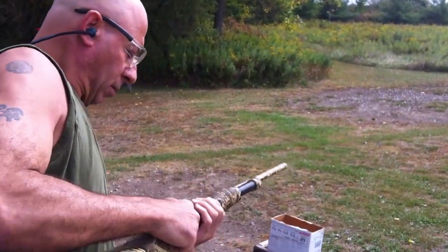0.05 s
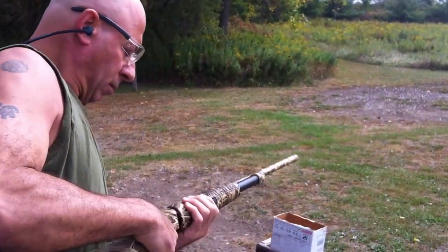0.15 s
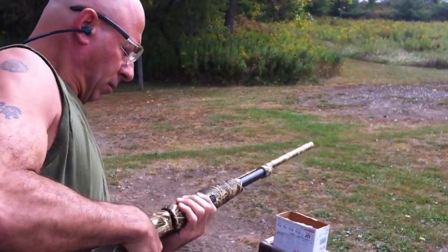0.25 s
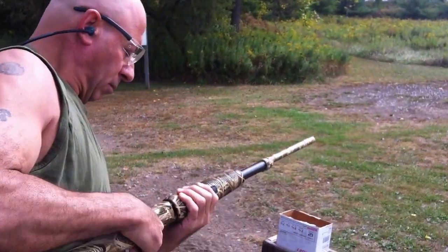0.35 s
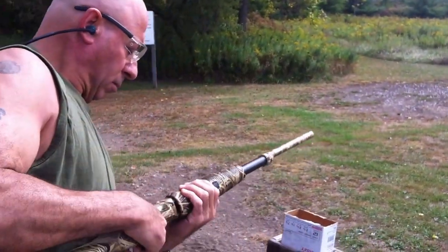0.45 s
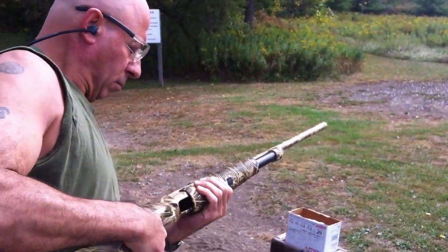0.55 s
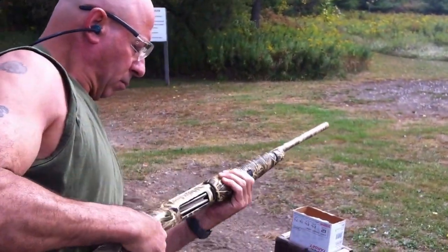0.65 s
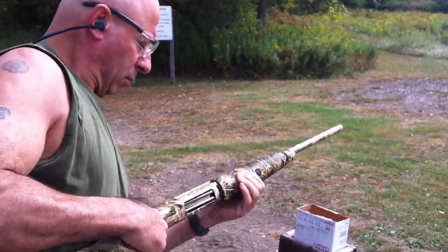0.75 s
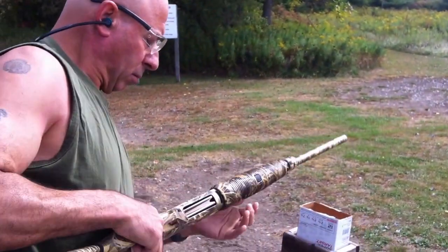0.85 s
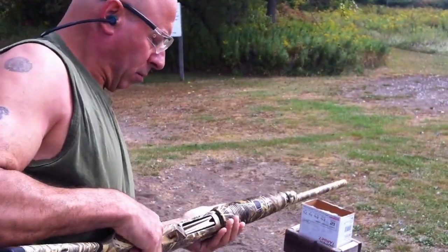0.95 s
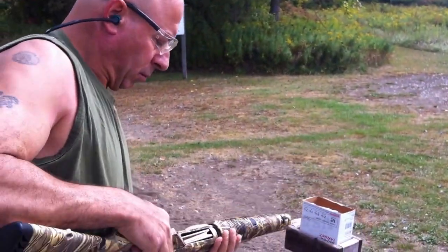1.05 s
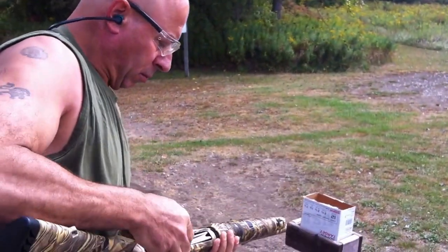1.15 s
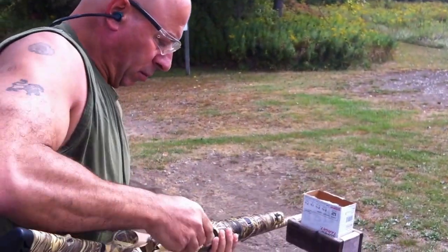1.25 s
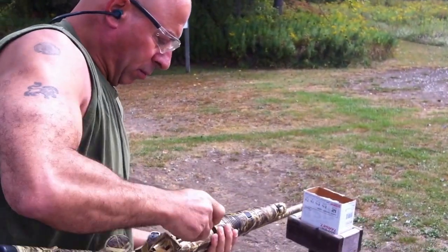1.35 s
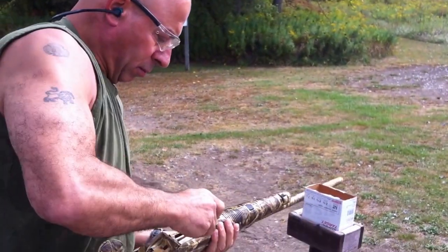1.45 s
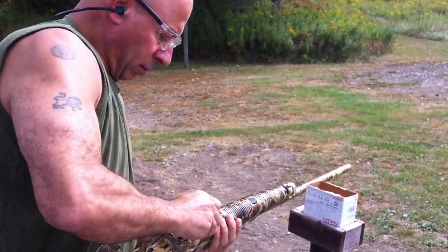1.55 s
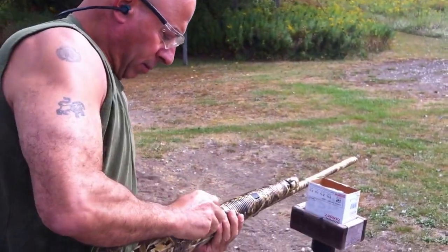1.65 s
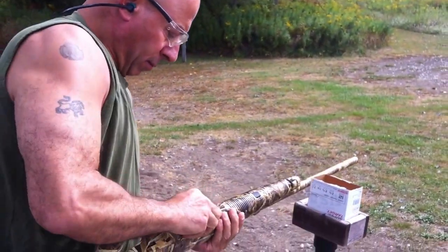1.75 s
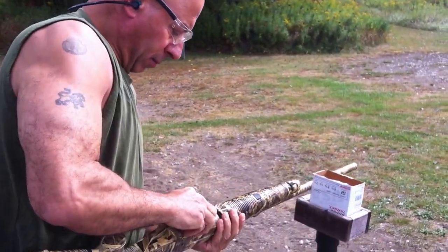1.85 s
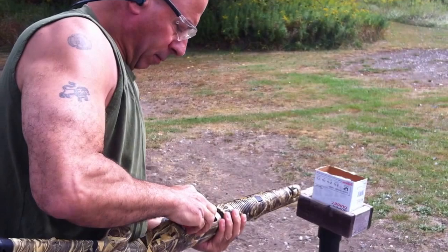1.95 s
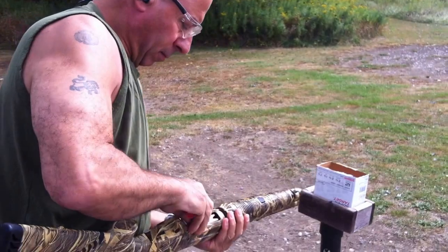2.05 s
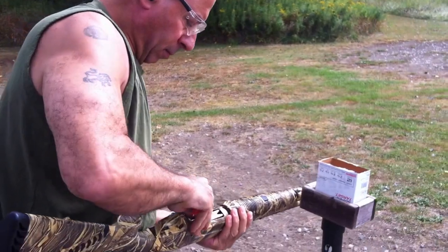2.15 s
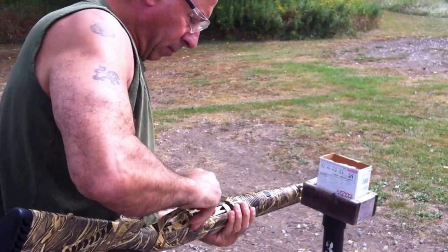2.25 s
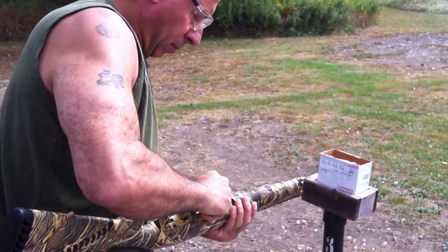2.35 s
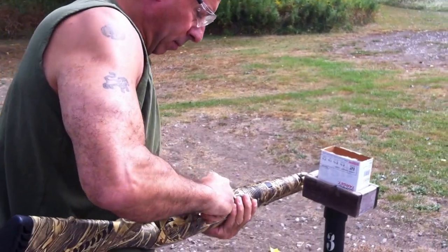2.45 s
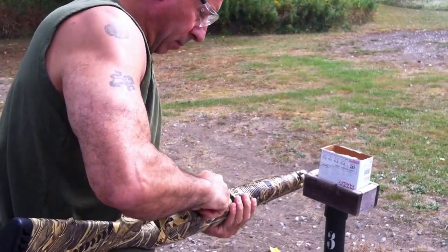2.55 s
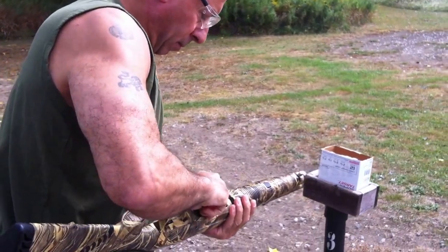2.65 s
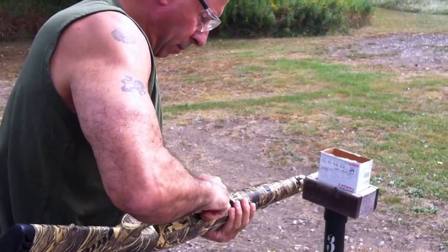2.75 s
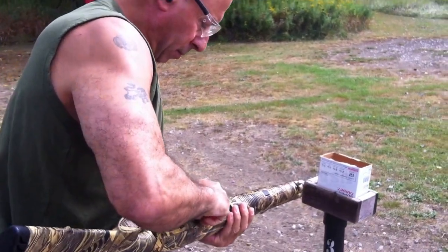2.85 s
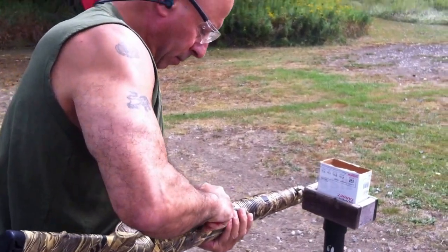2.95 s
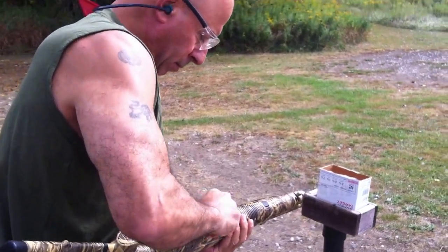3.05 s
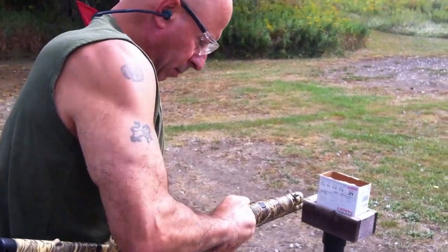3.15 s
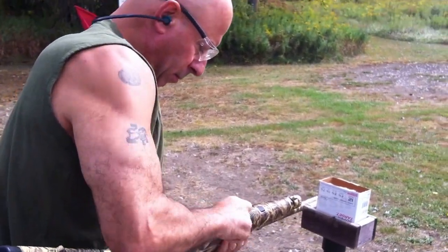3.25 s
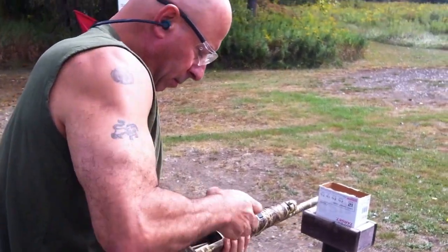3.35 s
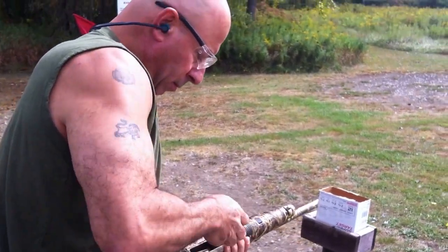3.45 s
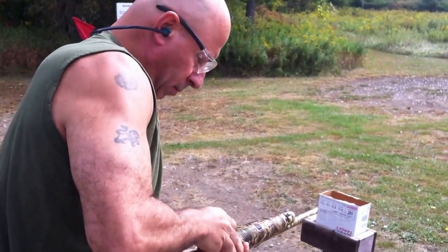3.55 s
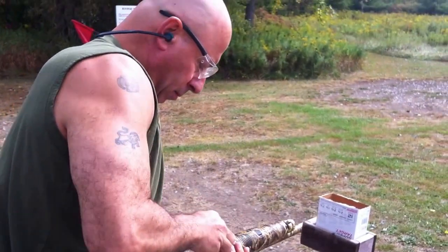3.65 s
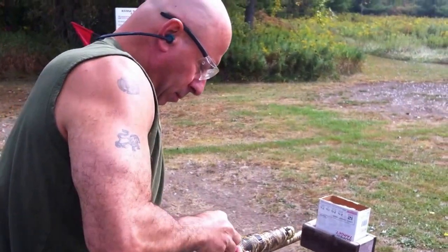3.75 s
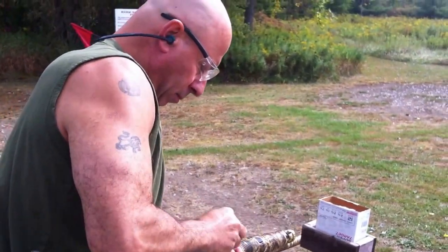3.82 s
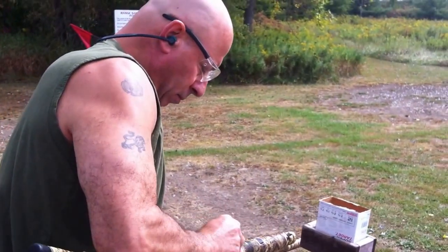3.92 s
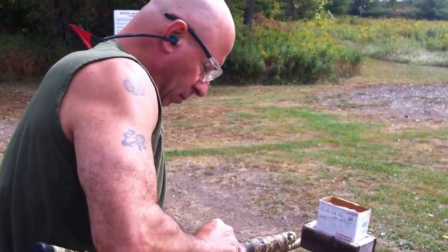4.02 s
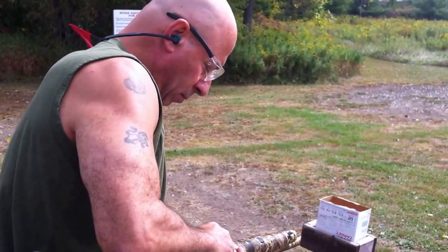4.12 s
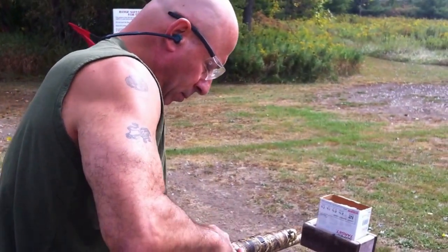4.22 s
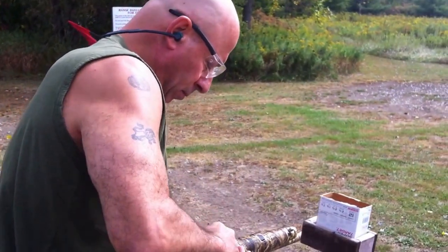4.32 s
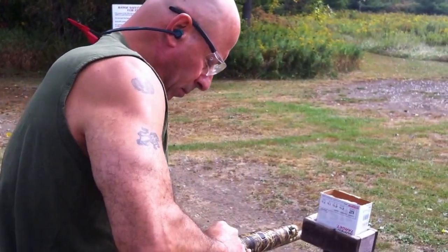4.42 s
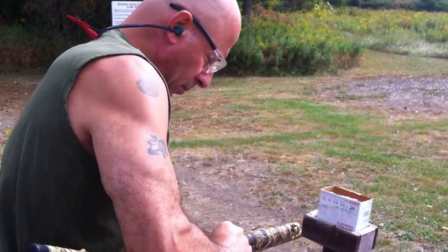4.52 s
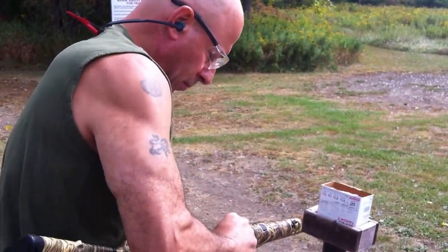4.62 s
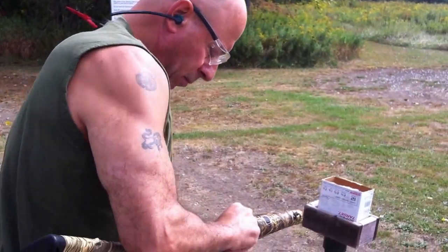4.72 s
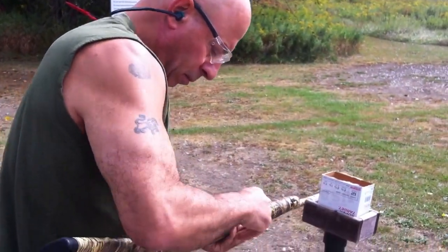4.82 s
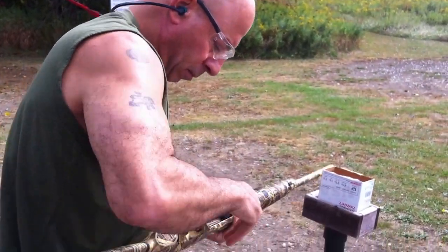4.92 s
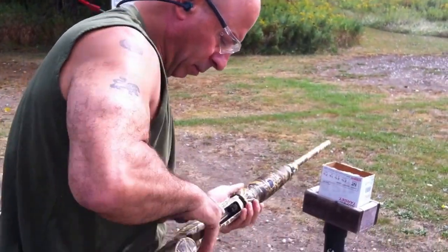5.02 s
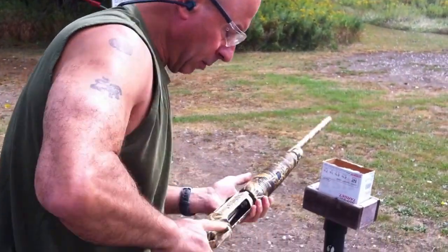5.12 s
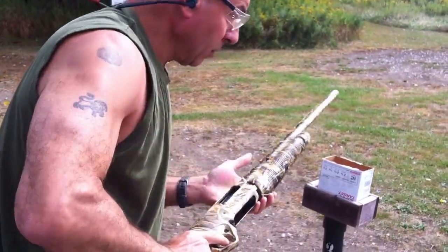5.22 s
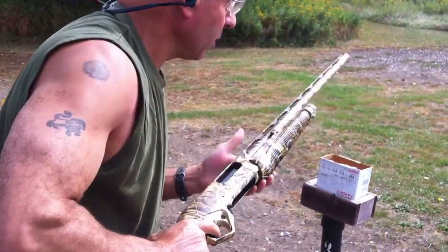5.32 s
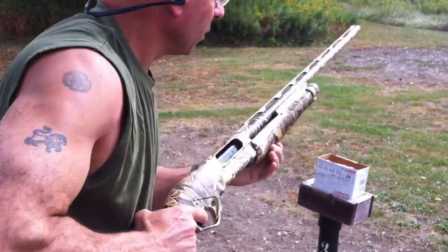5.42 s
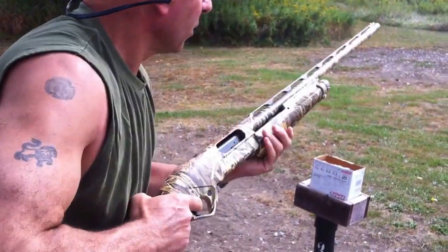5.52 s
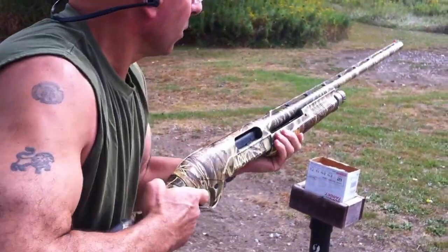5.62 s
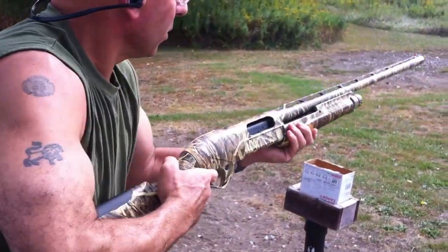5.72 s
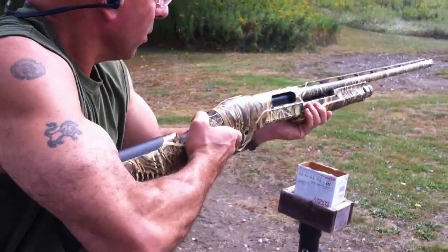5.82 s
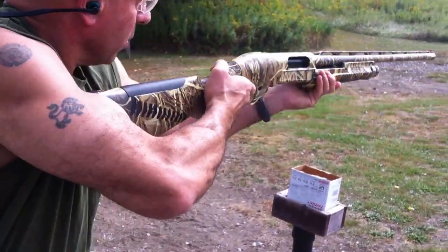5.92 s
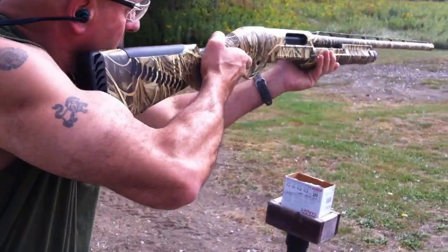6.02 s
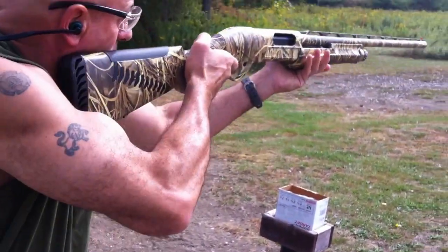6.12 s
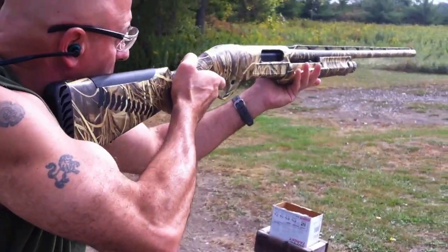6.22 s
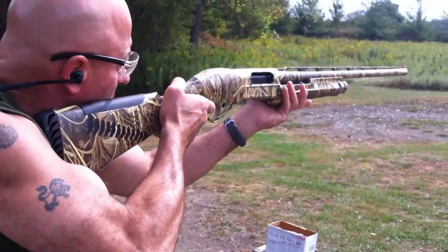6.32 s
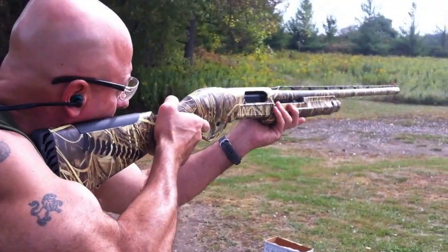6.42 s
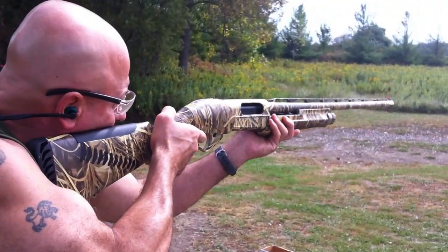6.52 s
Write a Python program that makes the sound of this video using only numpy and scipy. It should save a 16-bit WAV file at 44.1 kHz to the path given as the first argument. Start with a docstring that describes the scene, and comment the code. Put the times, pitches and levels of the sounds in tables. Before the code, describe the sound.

A nearby microphone in a grassy field catches a gun action racked with a hard, bright metal crash, the background dipping slightly afterwards. Then come quiet gaps broken by crisp snaps, rubbing and clustered clicks of shells going into a tube. A thin whistle-like squeak marks the final push. Soft knocks follow, then only far rustle and fine insect trilling remain.

```python
"""Outdoors in a grassy field, a pump shotgun is racked and loaded close by: shells click past the lifter
and slide into the magazine tube. Knocks and scrapes shake four parts of the gun, each a set of resonances.
The magazine spring squeaks as a gliding sine. Insects trill as pulsed hiss over far rustle and light wind,
both shaped noise. The recorder's gain control turns the sound down after loud passages."""
import sys
import numpy as np
from scipy import signal
from scipy.fft import rfft, irfft
from scipy.io import wavfile
from scipy.ndimage import uniform_filter1d

SR = 44100
rng = np.random.default_rng(int(sys.argv[2]) if len(sys.argv) > 2 else 0)


def unload_wav(signal):
    """Save mono or channel-first audio to the path in sys.argv[1] as 16-bit WAV at rate SR, clipped to [-1, 1]."""
    wavfile.write(
        sys.argv[1],
        SR,
        np.round(np.clip(np.atleast_2d(signal).T, -1, 1) * 32767).astype(np.int16),
    )


N = 290072


def gain_of(db):
    """Turns decibels into amplitude."""
    return 10 ** (np.asarray(db) / 20)


def evened(x):
    """Scales a signal to an rms (average strength) of 1."""
    return x / np.sqrt(np.mean(x ** 2) + 1e-20)


def add(mix, start_s, sound):
    """Mixes a sound in at a start time, cut off where the mix ends."""
    part = mix[..., round(start_s * SR):][..., :sound.shape[-1]]
    part += sound[..., :part.shape[-1]]


def coloured(points):
    """Steady noise of rms 1 whose spectrum joins the given points on a log-frequency axis."""
    points_hz, points_db = np.transpose(points)
    hz = np.fft.rfftfreq(N, 1 / SR)
    spectrum_db = np.interp(np.log(hz + 1), np.log(points_hz), points_db)
    white = rng.standard_normal(N)
    return evened(irfft(rfft(white) * gain_of(spectrum_db), N))


def mode(x, hz, width_hz):
    """A two-pole resonance, one pitch a body rings at, scaled so that white noise keeps its power."""
    r = np.exp(-np.pi * width_hz / SR)
    feedback = [1, -2 * r * np.cos(2 * np.pi * hz / SR), r ** 2]
    return np.sqrt((1 - r ** 2) / 2) * signal.lfilter([1, 0, -1], feedback, x)


BREEZE_DB, LULL_S, LULL_LENGTH_S, LULL_DB = -67.5, 0.83, 0.49, -7.5  # the lull is relative to the breeze
# Gusts at the microphone: peak_s, level_db, reach_s (this far from its peak a gust is down to a seventh)
GUSTS = [(.0, -46.5, 0.071), (1.48, -56, 0.11), (1.674, -52, 0.023), (1.845, -47, 0.035),
         (2.4, -58.5, 0.39)]


def wind():
    """Lumpy low buffeting at the microphone: a steady breeze with one lull, and a few gusts."""
    t = np.arange(N) / SR
    in_lull = (t > LULL_S) & (t < LULL_S + LULL_LENGTH_S)
    level = gain_of(BREEZE_DB + LULL_DB * in_lull)
    for peak_s, db, reach_s in GUSTS:
        level = level + gain_of(db) * np.exp(-abs(t - peak_s) * 2 / reach_s)
    lumps = evened(uniform_filter1d(uniform_filter1d(rng.standard_normal(N), 1500), 1500))
    # pitch_hz, relative level_db
    buffet = coloured([(20, -23), (60, -13.0), (130, 1), (200, -0.5), (300, -17.0), (600, -38)])
    return level * gain_of(2.0 * lumps) * buffet


RUSTLE_DB = -55  # overall level
# Tone colour of the far leaves and air: pitch_hz, level_db (per Hz, relative)
RUSTLE = [(24, -39), (40, -19), (137, -10), (220, 1), (529, -5.5), (770, -1), (852, -4), (2700, -4),
          (5050, -13.5), (8340, -10.5), (8990, -15.5), (12100, -13), (16000, -13.5)]


def rustle():
    """Far leaves and air: shaped noise that swells a little, slowly and at random."""
    swell = evened(uniform_filter1d(uniform_filter1d(rng.standard_normal(N), 6000), 6000))
    swell_db = 0.6 * swell
    return gain_of(RUSTLE_DB + swell_db) * coloured(RUSTLE)


CRICKETS_HZ, CRICKETS_DB = 6650, -72  # a faint steady band
TRILL_RISE_S, BETWEEN_DB = 0.99, -64.5  # time for a full-scale rise; hiss level between phrases
STUTTER_S, STUTTER_DB, STUTTER_PER_S = 0.43, 9.5, 13
# Insect phrases: start_s, length_s, level_db, fade_s (fade at the end)
INSECTS = [(0.03, 2.1, -56, 0.072), (1.75, 1.1, -61, 0.35), (2.985, 2.35, -56.5, .5), (5.672, 2.2, -56, .5)]
# Tone colour of the insect hiss: pitch_hz, level_db (per Hz, relative)
TRILL = [(9000, -20), (10500, -7.5), (12000, -0.5), (13500, -1.5), (15000, -4.5), (16000, -6.5)]


def insects():
    """High hiss pulsed about 45 times a second; phrases stutter in, swell and fade over far crickets."""
    t, level = np.arange(N) / SR, gain_of(BETWEEN_DB)
    for start_s, length_s, db, fade_s in INSECTS:
        u = t - start_s
        rise = 0.28 + u / TRILL_RISE_S
        fade = (length_s - u) / fade_s
        shape = np.clip(np.minimum(rise, fade), 0, 1) * (u > 0)
        stutter_left = np.clip(1.3 - u / STUTTER_S, 0, 1)
        stutter_db = STUTTER_DB * stutter_left * np.cos(2 * np.pi * STUTTER_PER_S * u)
        level = np.hypot(level, shape * gain_of(db + stutter_db))
    drift = evened(uniform_filter1d(rng.standard_normal(N), 20000, mode="wrap"))
    pulses_per_s = 45.0 + 1.6 * drift
    pulses_db = 2.5 * np.cos(2 * np.pi * np.cumsum(pulses_per_s) / SR)
    chorus = evened(mode(mode(rng.standard_normal(N), CRICKETS_HZ, 600), CRICKETS_HZ, 600))
    return level * gain_of(pulses_db) * coloured(TRILL) + gain_of(CRICKETS_DB) * chorus


TICK_DB, TICK_HZ = -4.5, 2850  # level is relative to the blow
CRISP_S = 0.0035  # chatter this short leaves the tick at TICK_DB; shorter is louder, longer softer
# Knocks: start_s, blow_db (on the receiver), stock_db and lifter_db (relative to the blow),
# spot_hz (pitch favoured by the spot struck), chatter_s (time for the chatter to fall 60 dB)
KNOCKS = [(.182, -44.5, 11.5, -3, 850, 0.02), (.341, -32.5, 2.5, -9, 802, 0.011),
          (0.375, -45.5, 8, 2, 1360, 0.061), (.438, -29, 0, -15, 2190, .017),
          (.451, -20.5, -10, 5, 2720, 0.01), (.467, -27.5, -5, 4, 2180, 0.015),
          (.524, -32, -15, -1.5, 4080, 0.026), (.545, -32.5, -2.5, -20, 1230, .023),
          (.679, -29, -4, -25, 1160, .014), (0.688, -27, 8.5, 3.5, 2550, 0.046),
          (0.708, -17, -3, -0.5, 886, 0.024), (.735, -21, -18, 4, 1840, 0.022),
          (.752, -12.5, -2.5, 8.5, 1890, 0.025), (.757, -13, -4.5, -1, 1830, 0.022),
          (0.776, -12.5, -5.5, 2.5, 3550, 0.027), (.783, -14, 3, 8, 1980, 0.027),
          (0.797, -6, -10, -0.5, 2980, 0.041), (0.804, -1.5, -10, -10.5, 2164, 0.021),
          (0.872, -38, -18, 3, 2490, 0.063), (0.935, -31, 1, -12, 640, 0.036),
          (1.081, -25, -18, -5, 2230, .04), (1.086, -39, 7, -3, 1128, .04),
          (1.264, -42, 0, -9, 1130, 0.037), (1.743, -29, 0, -9, 1450, 0.056),
          (2.55, -35.5, -2, -3, 774, 0.028), (2.673, -19, -4.5, 11.5, 4780, 0.02),
          (2.677, -41, -13, 24, 4640, 0.011), (2.739, -52, 0, 15.5, 6470, 0.026),
          (2.845, -39.5, 4.5, -9, 1230, 0.0051), (2.853, -28.5, -5.5, -6, 730, .02),
          (2.973, -16, -4.5, 2.5, 9350, 0.017), (3.039, -43, 2, 2, 645, .027),
          (3.224, -25.5, 2.5, -18, 3600, 0.019), (3.298, -17, 3.5, 6, 1530, 0.013),
          (3.304, -20, -15, -5, 1540, 0.071), (3.313, -28, -14, 3, 2600, 0.027),
          (3.366, -39.5, -12, 3, 1570, 0.051), (3.422, -20, -1.5, 1, 1450, 0.033),
          (4.187, -15.5, -3.5, 1.5, 8500, 0.011), (4.288, -12.5, -20, 5, 8500, 0.0067),
          (4.291, -35, -10, 23, 7900, 0.012), (4.356, -44.5, -9, 8.5, 7000, 0.032),
          (4.543, -34, 7, 1, 1570, 0.036), (4.563, -36.5, 4, -8, 1620, 0.0044),
          (4.608, -19, -6, -14, 1290, 0.0026), (4.617, -27.5, -1, -9, 1240, 0.0033),
          (4.656, -26, -3, -4, 3040, 0.0088), (4.712, -27.5, -18, -8, 1550, 0.037),
          (4.731, -10.5, -2, 6.5, 3800, 0.012), (4.735, -16.5, -15, -13, 1550, 0.01),
          (4.798, -41, -1, 1, 1550, 0.034), (4.911, -22, -8, 5, 2720, 0.027),
          (4.913, -28.5, 12.5, 3, 624, 0.015), (5.39, -53, 11.5, -6, 324, .02),
          (5.447, -36.5, -16, 0, 2200, 0.045), (5.629, -28.5, -2, -10, 1820, 0.011),
          (5.634, -22.5, -15, -1.5, 2750, .038)]


def ticks():
    """The bare contact of each knock: about one cycle of air, heard along with the ringing parts."""
    out, t = np.zeros(N), np.arange(-40, 40) / SR
    snap = np.sin(2 * np.pi * TICK_HZ * t) * np.exp(-(TICK_HZ * t * 3.0) ** 2)
    for start_s, blow_db, *_, chatter_s in KNOCKS:
        crispness = min(CRISP_S / chatter_s, 2)
        add(out, start_s, gain_of(blow_db + TICK_DB) * crispness * snap)
    return out


PINS_DB = -6  # the small pins answer a knock this far below the lifter


def knock_force(part, hz):
    """Force on one mode: a sharp first contact, then dying chatter; the spot struck favours one pitch."""
    force, t = np.zeros(N), np.arange(3000) / SR
    for start_s, blow_db, stock_db, lifter_db, spot_hz, chatter_s in KNOCKS:
        part_db = (stock_db, 0, lifter_db, lifter_db + PINS_DB)[part]
        spot_db = 11.1 * np.exp(-(np.log(hz / spot_hz) / 0.1) ** 2)
        chatter = gain_of(-60 * t / chatter_s) / np.sqrt(chatter_s / 0.0064)
        contact = 0.35 * np.exp(-t / 0.00045)
        onset = np.minimum(t / 0.00076, 1)
        add(force, start_s, gain_of(blow_db + part_db + spot_db) * (chatter + contact) * onset)
    return force


def hump(start_s, top_s, end_s):
    """Shares of the rise still to come and of the fall gone by, and where the stroke sounds."""
    t = np.arange(N) / SR
    before = np.clip((top_s - t) / (top_s - start_s), 0, 1)
    after = np.clip((t - top_s) / max(end_s - top_s, .001), 0, 1)
    return before, after, (t >= start_s) & (t <= end_s)


SWELL_DB, DIE_DB = 17, 16.5  # a stroke swells to its hardest, then dies
TREBLE_SHARE = 0.69  # the treble follows this much of the swell
# Strokes of metal or shell sliding: start_s, hardest_s, end_s, scrape_db, treble_db (relative to the scrape)
# A stroke stops at end_s even before its hardest; one that ends before it starts is silent.
SLIDES = [(0.417, .475, 0.54, -48.5, -11), (0.666, 0.702, 0.75, -35, -6.5), (.73, .76, 0.79, -27, -6),
          (.785, 0.795, 0.827, -19, 2), (0.817, .825, 0.95, -43, -5), (2.827, 2.846, 2.57, -50, -8),
          (3.216, 3.291, 3.342, -38, 6), (3.37, 3.416, 3.44, -48, -8), (4.286, 4.291, 4.29, -24, 3),
          (4.448, 4.563, 4.75, -55, -5), (4.637, 4.638, 4.655, -44, -22), (4.649, 4.706, 4.762, -42.5, 7.5),
          (4.893, 4.91, 4.912, -40.5, -12)]


def scrape_force():
    """Rubbing surfaces catch unevenly: the force comes in clumps a millisecond or two long."""
    force = np.zeros((4, N))  # stock, receiver, lifter, pins
    catches = evened(uniform_filter1d(rng.standard_normal((5, N)), 90, axis=1))
    clumps = gain_of(3.5 * catches[1:] + 2.8 * catches[0])  # each part's own catches plus shared ones
    for start_s, top_s, end_s, db, treble_db in SLIDES:
        before, after, on = hump(start_s, top_s, end_s)
        low_db = -SWELL_DB * before - DIE_DB * after
        high_db = treble_db - TREBLE_SHARE * SWELL_DB * before - DIE_DB * after ** 2
        soft_edges = uniform_filter1d(on * 1., 200)
        parts_db = [low_db - 5.0, low_db, high_db, high_db - 4.5]
        force += soft_edges * gain_of(db) * gain_of(parts_db)
    return force * clumps


# Pitches each part of the gun rings at: pitch_hz, width_hz (wider dies sooner), level_db (relative)
STOCK = [(337, 110, -12.5), (613, 132, -6), (760, 63, -2.5), (934, 67, -1), (1134, 59, 1),
         (1280, 480, -0.5)]
RECEIVER = [(1551, 110, 1), (1772, 59, -3.5), (2008, 220, -0.5), (2130, 330, -4), (2523, 250, -1.5),
            (2960, 390, -1), (3480, 670, -0.2)]
LIFTER = [(4000, 230, -5.5), (3650, 210, -13.5), (4210, 360, -7), (4616, 270, -5), (5570, 480, -7),
          (6980, 850, -3), (7850, 32, -11.5), (8530, 860, -4.5)]
PINS = [(9660, 880, -0.5), (9700, 2700, -3.9), (12200, 1700, 1.5), (13760, 600, -10), (14800, 1200, -2)]


def gun():
    """Every mode feels its own share of the rough contact, so no two knocks ring alike."""
    out, scrape = ticks(), scrape_force()
    for k, part in enumerate((STOCK, RECEIVER, LIFTER, PINS)):
        ring = np.zeros(N)
        for hz, width_hz, db in part:
            rough_force = np.hypot(knock_force(k, hz), scrape[k]) * rng.standard_normal(N)
            ring += gain_of(db) * mode(rough_force, hz, width_hz) / np.sqrt(len(part))
        # little radiates outside the modes' range
        edges_hz = part[0][0] / 1.5, min(part[-1][0] * 1.5, 20000)
        out += signal.lfilter(*signal.butter(1, edges_hz, "band", fs=SR), ring)
    bounces = np.zeros(900)  # direct sound and two bounces off the ground and the shooter
    bounces[[0, 210, 520]] = 1, .25, .12
    return signal.oaconvolve(out, bounces)[:N]


SQUEAK_HZ, SQUEAK_RISE_HZ = 12450, 250
SQUEAK_S, SQUEAK_ATTACK_S, SQUEAK_HOLD_S, SQUEAK_RELEASE_S = 4.666, 0.035, 0.047, 0.022
SQUEAK_DB, SQUEAK_ENDS_DB = -27, -29  # the ends are relative to the loudest point


def squeak():
    """The magazine spring as the last shell goes in: a thin fluttering whistle, rising as it tightens."""
    corners_s = SQUEAK_S + np.cumsum([0, SQUEAK_ATTACK_S, SQUEAK_HOLD_S, SQUEAK_RELEASE_S])
    t = np.arange(N) / SR
    on = (t >= corners_s[0]) & (t <= corners_s[-1])
    db = SQUEAK_DB + SQUEAK_ENDS_DB * np.interp(t, corners_s, [1, 0, 0.037, 1])
    flutter = evened(uniform_filter1d(rng.standard_normal((2, N)), 90, axis=1))
    progress = np.cumsum(on) / on.sum()
    hz = SQUEAK_HZ + SQUEAK_RISE_HZ * progress + 60 * flutter[0]
    whistle = np.sqrt(2) * np.sin(2 * np.pi * np.cumsum(hz) / SR)
    return on * gain_of(db + 2.9 * flutter[1]) * whistle


def scene():
    """The gun close by over the field's background."""
    return (wind() + rustle() + insects() + gun() + squeak())[None]


EDGE_HZ = 15780  # little passes above this pitch


def record(dry):
    """Gain control turns down after loud passages and creeps back; then the top of the treble is cut."""
    power_db = 10 * np.log10(abs(uniform_filter1d(dry[0] ** 2, 2600, origin=1200)) + 1e-12)
    recovery_db = np.arange(N) * 3.1 / SR  # 3.1 dB a second
    excess_db = 0.71 * np.maximum(power_db + 24.5, 0)  # acts above -24.5 dB
    cut_db = np.maximum(np.maximum.accumulate(excess_db + recovery_db) - recovery_db, 0)
    ducked = dry / gain_of(uniform_filter1d(cut_db, 1500, origin=700))
    low_pass = signal.firwin(511, EDGE_HZ, window=("kaiser", 9), fs=SR)
    return signal.oaconvolve(ducked, low_pass[None], "same")


dry = scene()
out = record(dry)
unload_wav(out)
```